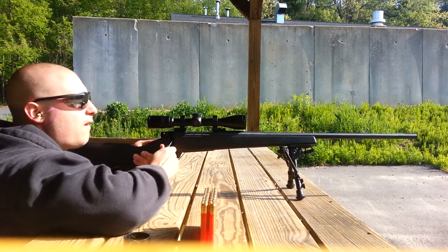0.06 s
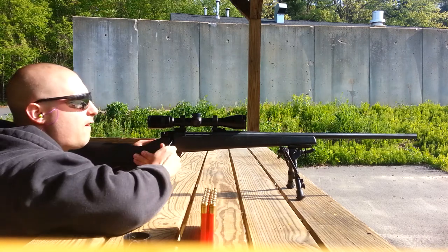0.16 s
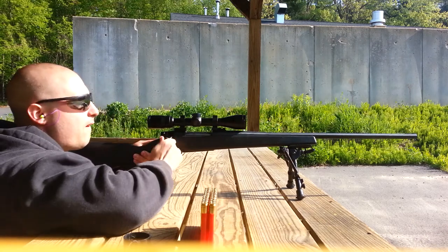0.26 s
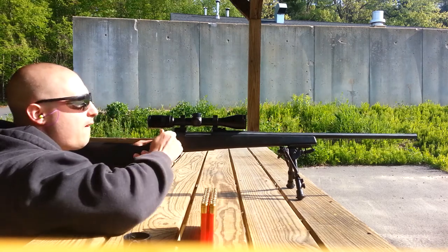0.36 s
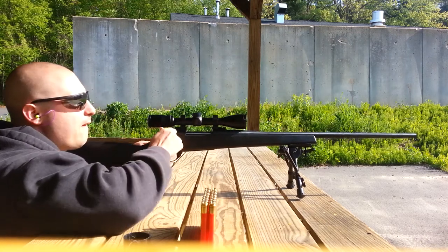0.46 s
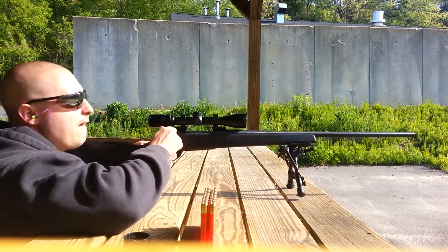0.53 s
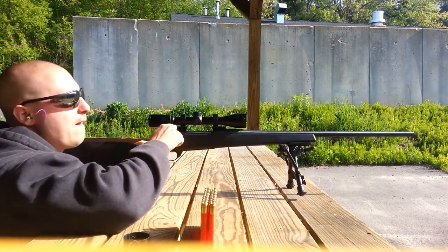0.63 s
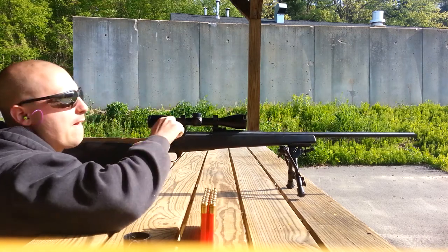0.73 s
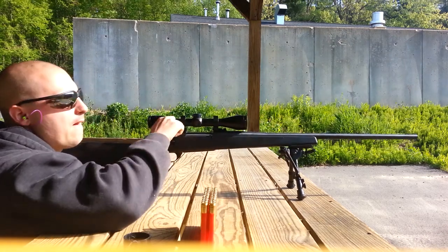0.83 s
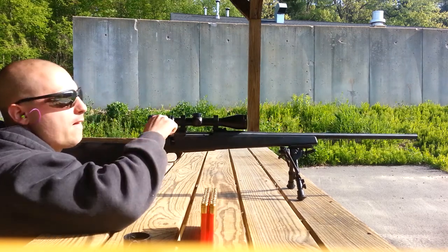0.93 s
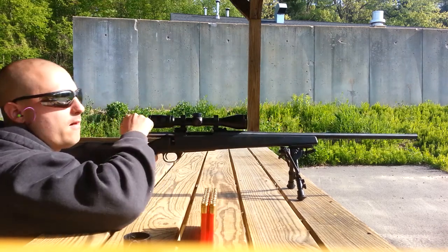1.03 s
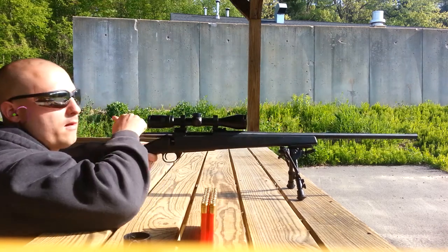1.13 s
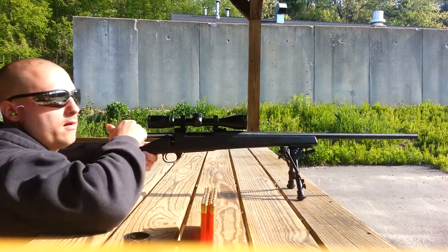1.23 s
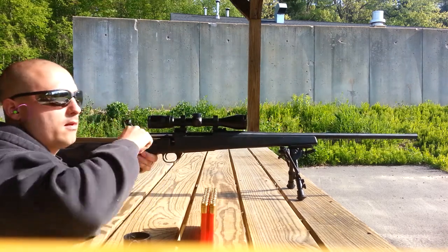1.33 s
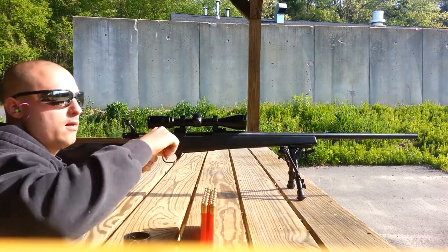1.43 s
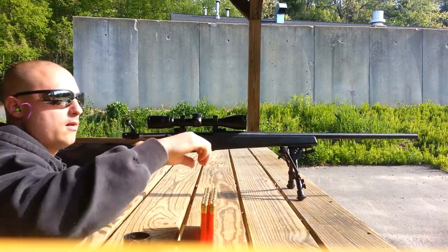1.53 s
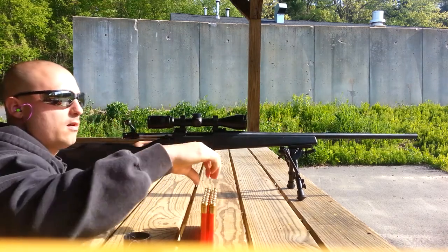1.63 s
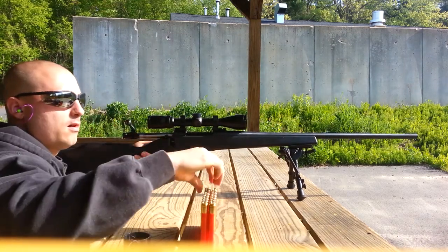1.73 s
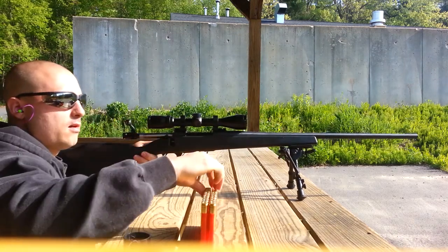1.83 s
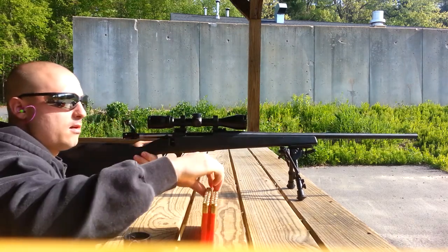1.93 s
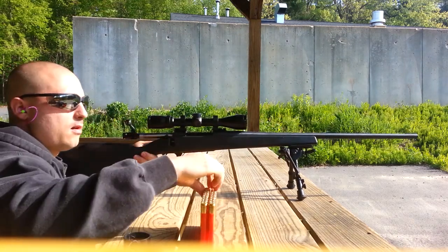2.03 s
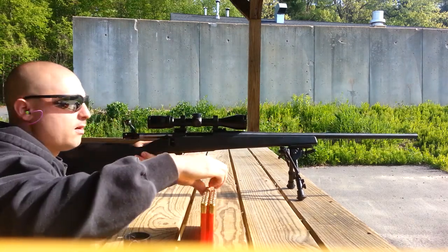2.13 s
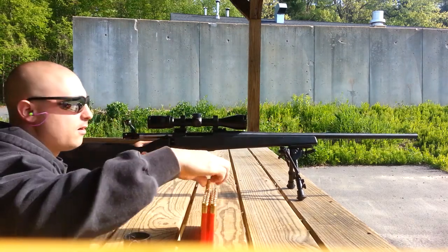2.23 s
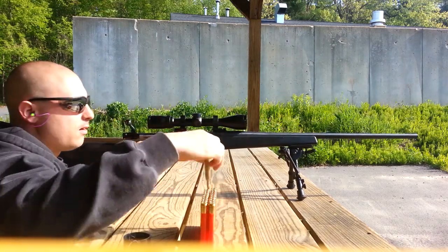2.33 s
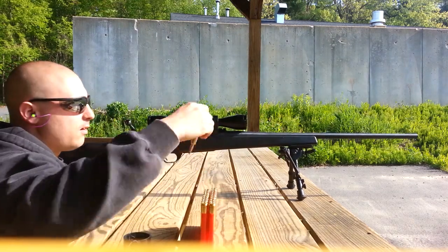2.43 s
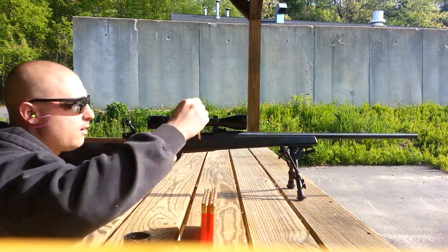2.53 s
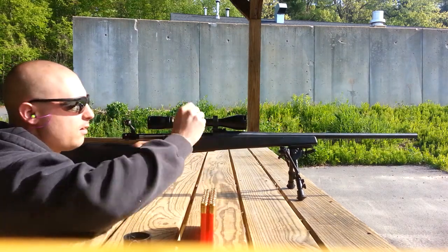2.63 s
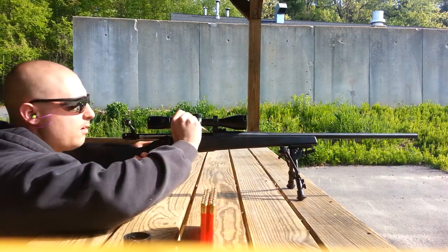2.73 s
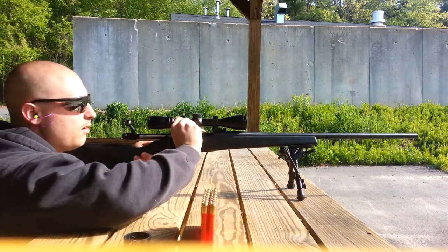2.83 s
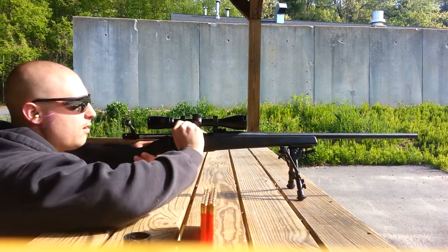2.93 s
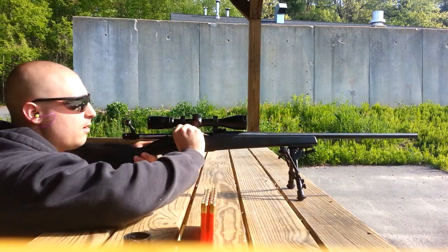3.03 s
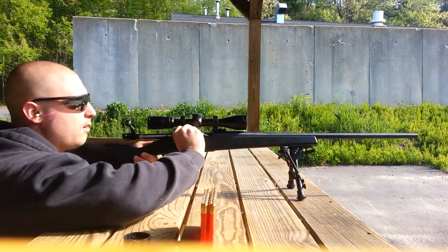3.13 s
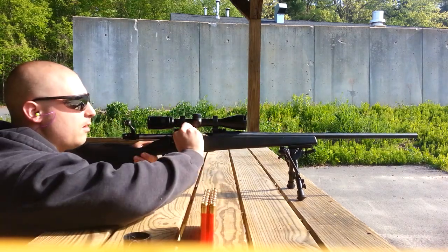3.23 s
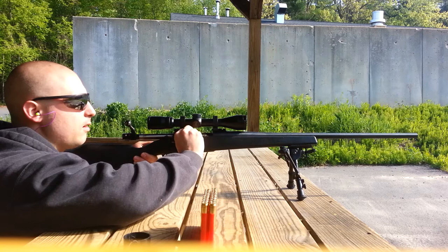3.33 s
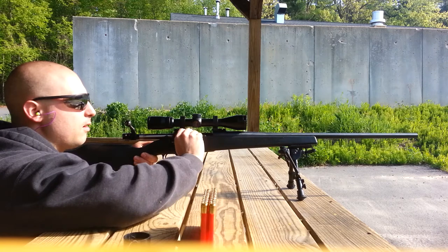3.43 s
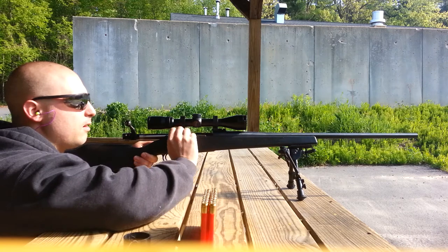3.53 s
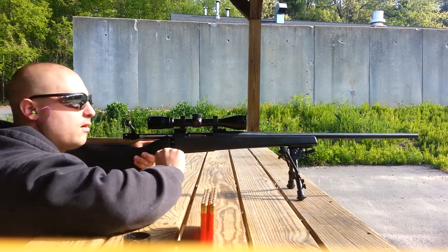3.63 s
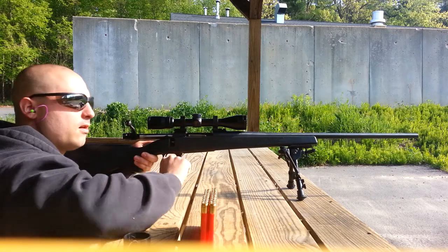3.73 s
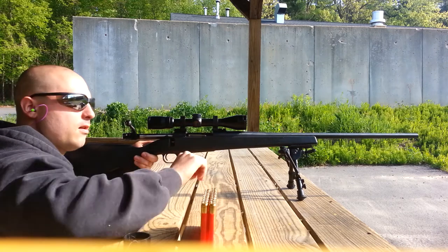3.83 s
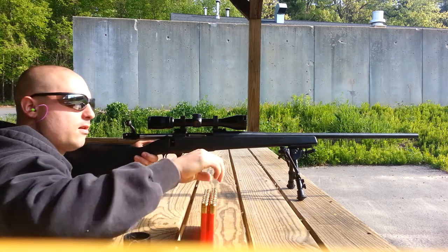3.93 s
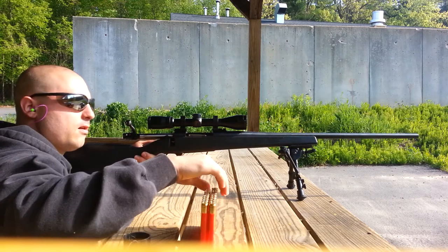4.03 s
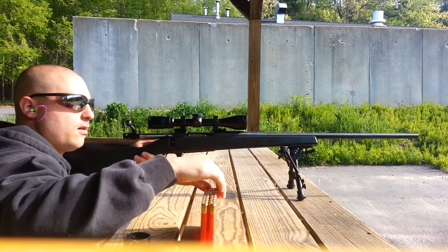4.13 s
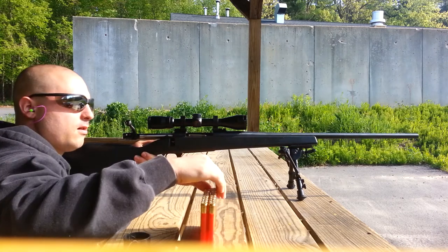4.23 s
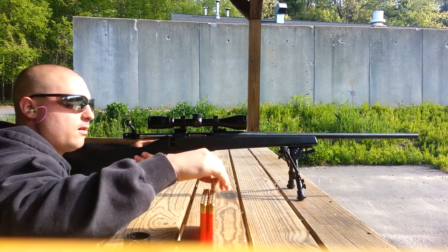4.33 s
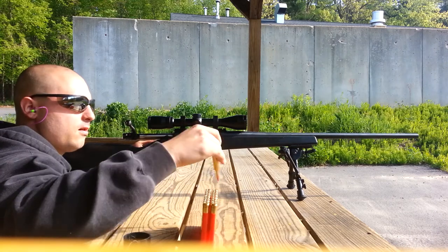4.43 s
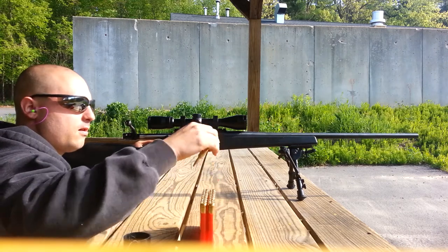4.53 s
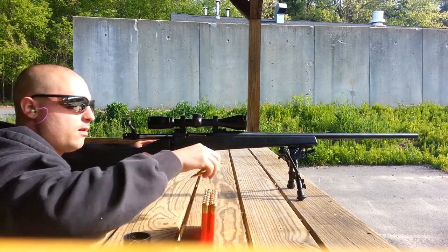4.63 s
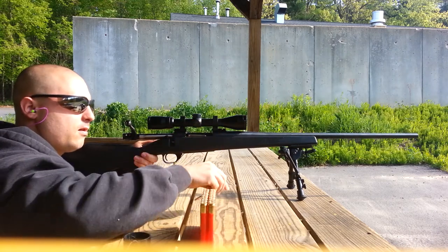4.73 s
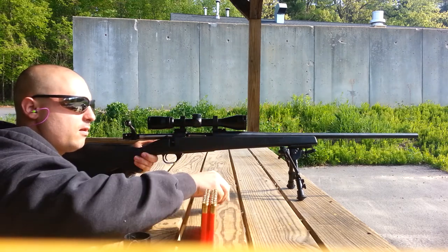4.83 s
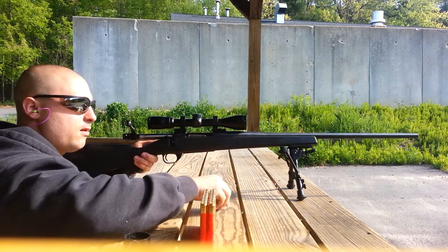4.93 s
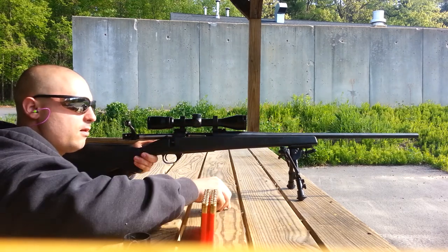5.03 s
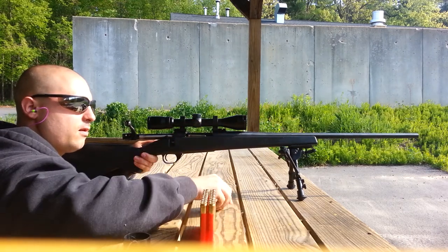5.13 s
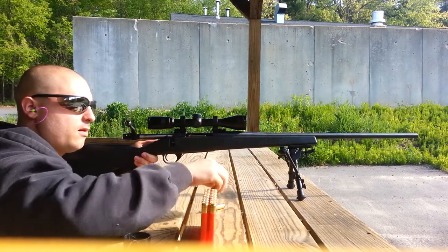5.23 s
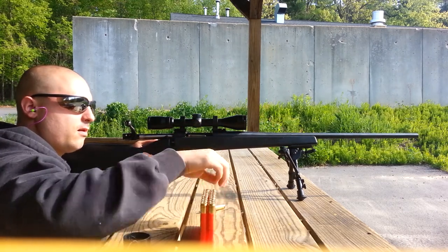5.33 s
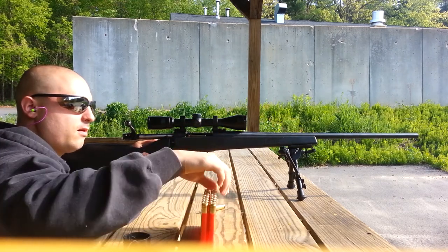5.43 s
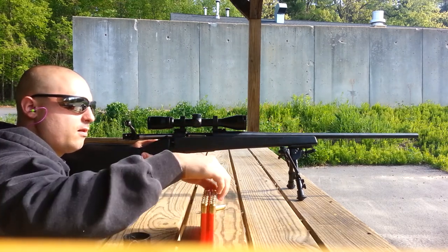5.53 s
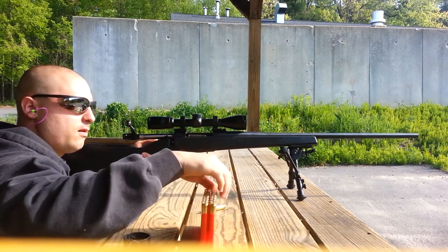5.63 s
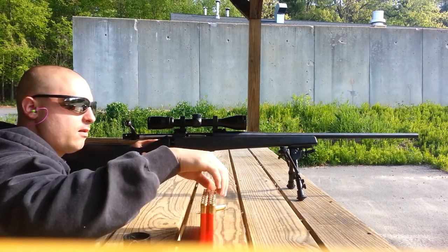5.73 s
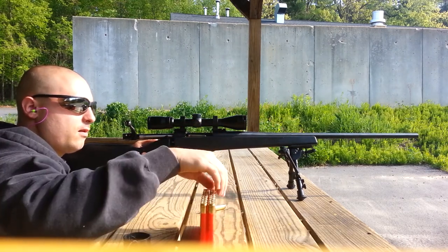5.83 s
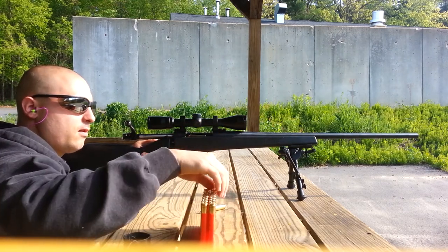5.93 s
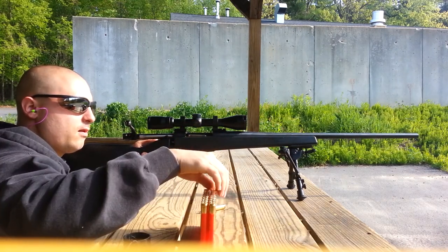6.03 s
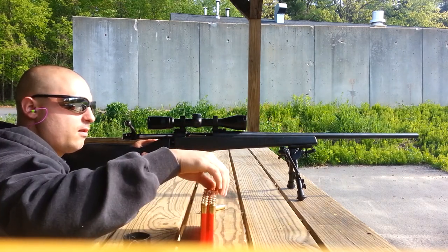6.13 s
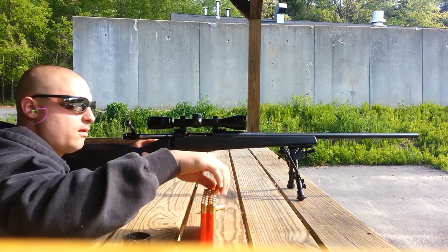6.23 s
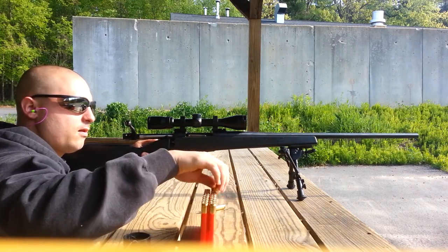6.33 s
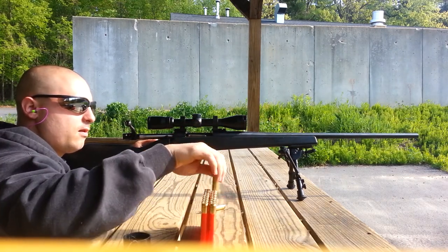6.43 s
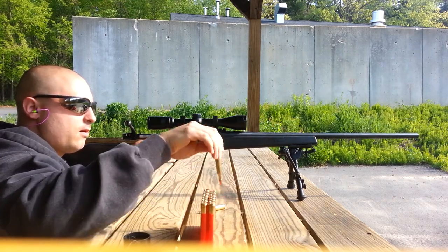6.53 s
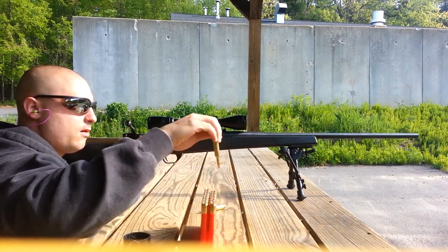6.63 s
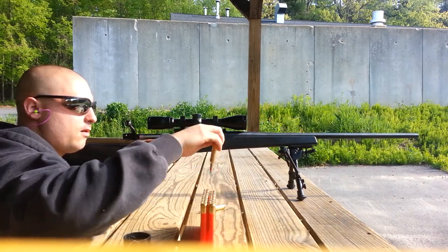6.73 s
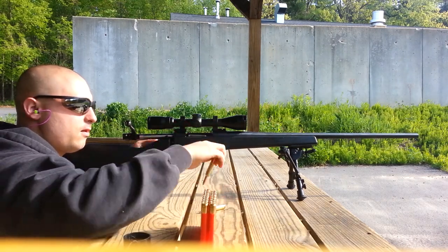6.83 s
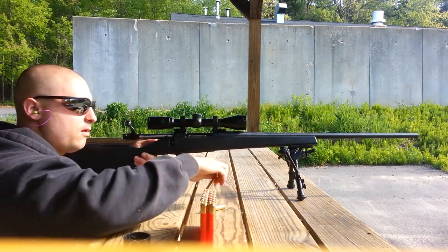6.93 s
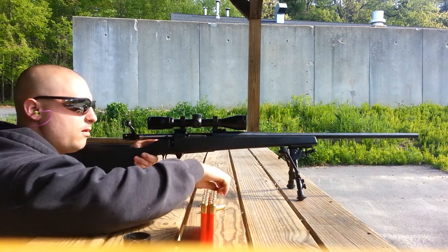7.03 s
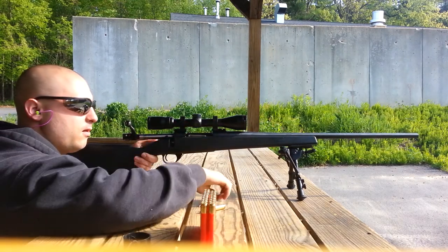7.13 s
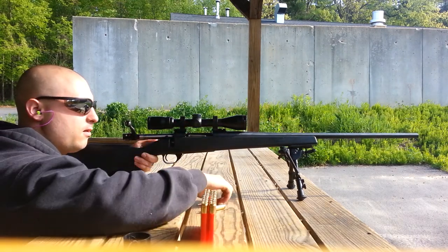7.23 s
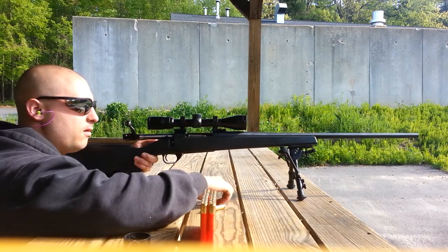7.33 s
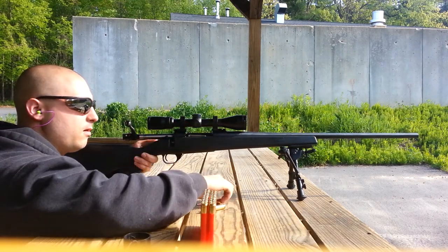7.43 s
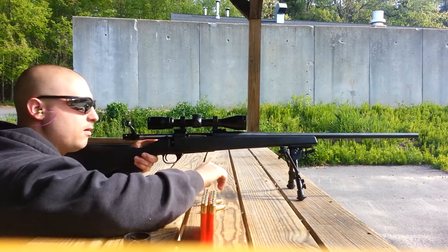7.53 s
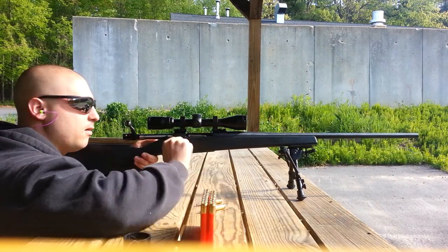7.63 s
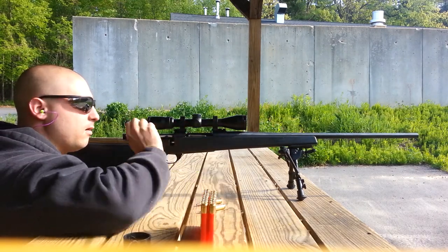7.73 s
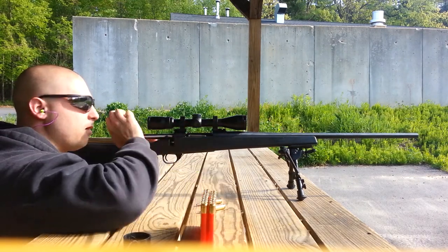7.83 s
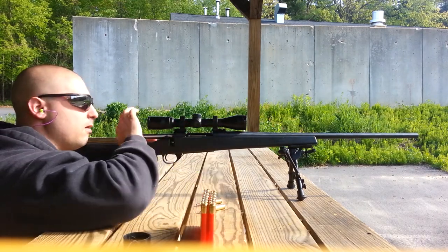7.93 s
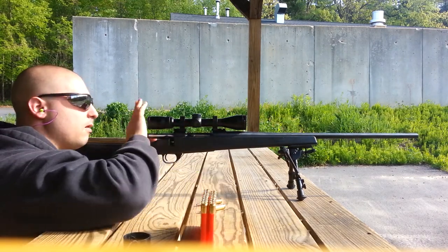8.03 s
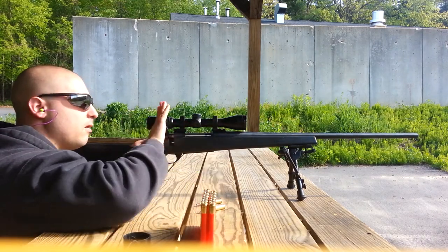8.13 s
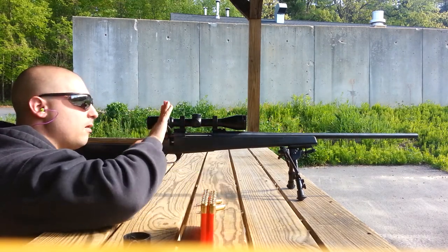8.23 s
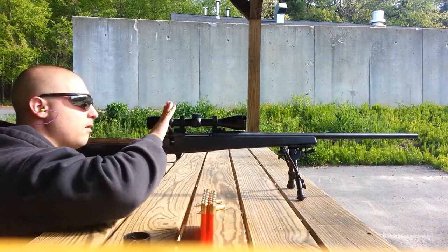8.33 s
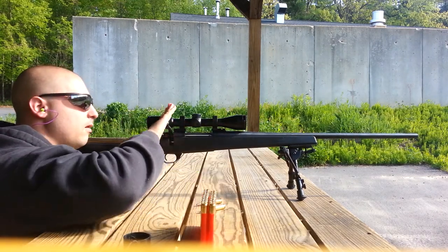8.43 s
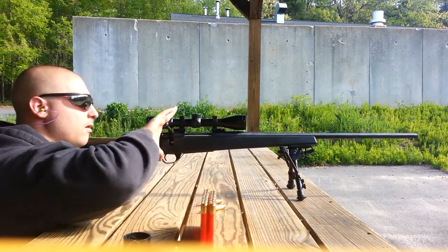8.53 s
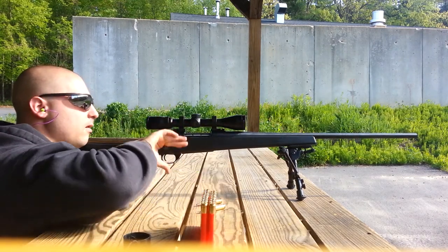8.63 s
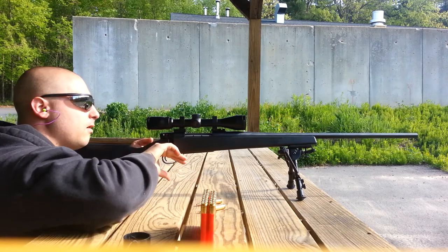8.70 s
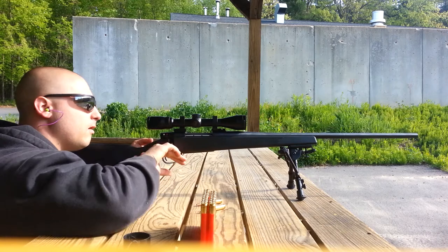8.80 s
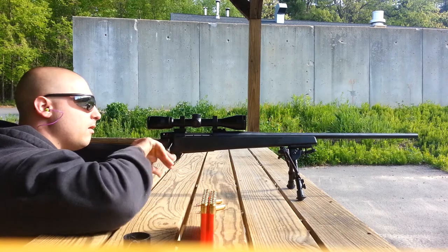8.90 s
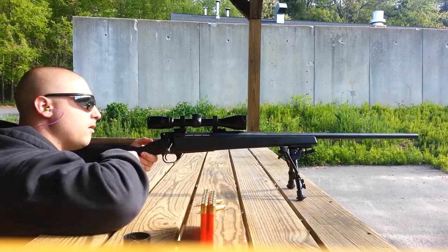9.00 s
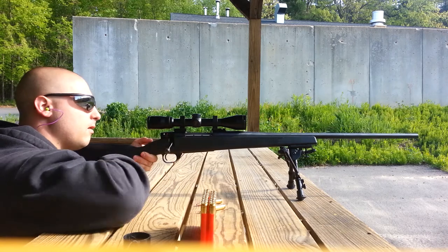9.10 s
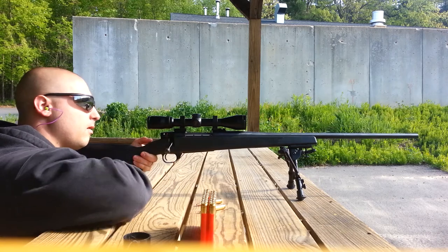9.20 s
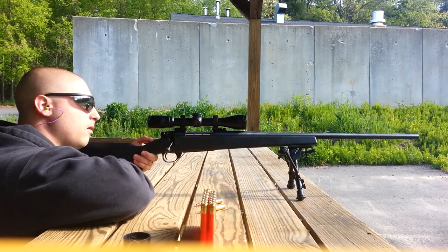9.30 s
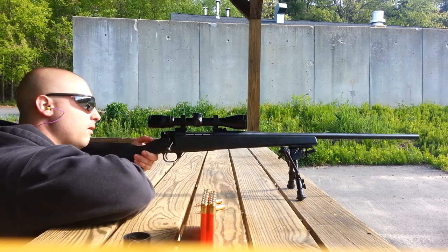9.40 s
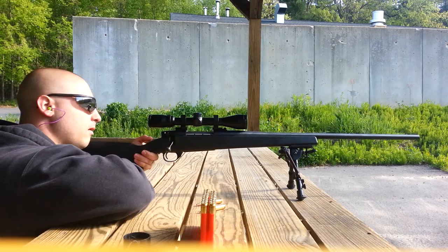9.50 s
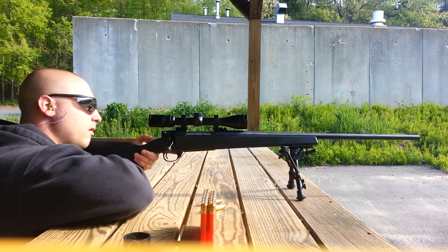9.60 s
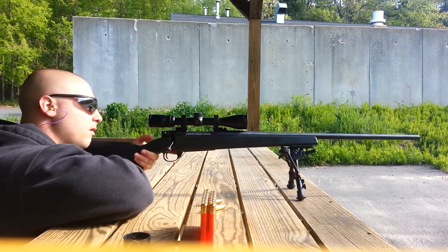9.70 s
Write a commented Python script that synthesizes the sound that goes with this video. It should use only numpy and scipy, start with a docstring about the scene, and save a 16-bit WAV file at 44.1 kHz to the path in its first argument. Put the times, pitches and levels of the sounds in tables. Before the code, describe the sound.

Outdoors under a roofed shooting bench, closely miked: a faint steel tick, then a loud bolt clack with bipod feet rattling on planks and a steel slide. Light brass and steel clicks follow as cartridges are loaded. A small bird trills rapidly in falling chips while cartridges knock dully on wood. The bolt then closes with a cluster of bright clacks, the last loudest. Soft traffic, rustle and hiss continue.

```python
"""A light tick of steel comes first, over far traffic and hiss; then a rifle bolt clacks open and shut.
Cartridges click into the magazine; cartridges and their box knock on the planks of an outdoor bench.
Blows excite damped modes of steel, brass and wood; sliding steel and shudders are shaped noise.
A small bird trills in falling sine chips and others whistle far off; rustle and a faint hum lie beneath.
A roof and far surroundings answer with noise whose frequencies decay at their own speeds."""
import sys
import numpy as np
from scipy import signal
from scipy.fft import rfft, irfft, next_fast_len
from scipy.io import wavfile
from scipy.ndimage import uniform_filter1d, map_coordinates

SR = 44100
rng = np.random.default_rng(int(sys.argv[2]) if len(sys.argv) > 2 else 0)


def generate_wav(sig):
    """Save sig (samples, or channels by samples) to the path in sys.argv[1] as 16-bit PCM at SR."""
    pcm = np.round(np.clip(np.atleast_2d(sig).T, -1, 1) * 32767).astype(np.int16)
    wavfile.write(sys.argv[1], SR, pcm)


N = 430416

# Steel contacts: (time [s], steel level [dB], bench, stock and bright steel re steel [dB each],
# favoured steel frequency [Hz])
STEEL_CONTACTS = [(0.0315, -34.5, -22.5, -9, -10.5, 2600), (0.7724, -22.5, -27.5, -18.5, -1, 4350),
                  (0.7793, -19.5, -31, -16, -1.5, 4730), (0.7907, -5, -29.5, -13, -7, 3080),
                  (0.797, -13, -23.5, -6, 5, 2900), (0.811, -19, 7, 0.5, -8.5, 4130),
                  (0.9906, -35, -29.5, -3, -19.5, 2160), (1.0126, -19.5, -15, -15, -16, 3680),
                  (1.0744, -27, -29.5, -6, -10.5, 2530), (1.0904, -22, -24, -4, -5.5, 3140),
                  (1.1031, -12.5, -5.5, -5, -1.5, 3780), (1.1117, -17.5, -17, -11, -6.5, 3980),
                  (1.273, -42, -7, -26, -24, 2060), (1.297, -50, 14.5, -6, -7, 2060),
                  (3.0665, -32, -17, -13, -6.5, 2530), (3.238, -29, -32, -8.5, -9.5, 3530),
                  (3.3865, -19, -36, -16.5, -4, 4480), (3.4143, -15, -32, -14.5, -7.5, 3070),
                  (3.4217, -21, -30, -12.5, -11.5, 2000), (3.4628, -18.5, -26, -16, -16, 2540),
                  (8.0022, -34.5, -12.5, -13, -25, 3890), (8.011, -32, -6, -9, -17, 3940),
                  (8.0397, -25.5, -29, -6, -13.5, 2330), (8.0577, -15, -24.5, -17, -4, 4460),
                  (8.089, -12.5, -20, -14.5, -1.1, 4480), (8.1085, -14.5, -19.5, -14, -9, 4460),
                  (8.1316, -4, -18.5, -9.5, 0.5, 3780), (8.1411, -5, -23.5, -15.5, -4, 2920),
                  (8.1633, -9, -13.5, -8.5, -5, 3800), (8.301, 2, -25.5, -17, -8, 3200),
                  (8.6189, -17.5, -18.5, -10.5, -17, 3940), (8.6242, -14.5, -24, -13, -9, 3130),
                  (8.6593, -25.5, -15, -13, 0.5, 2580), (8.705, -16, -6, -5, -15, 3560)]
# Modes of the bench planks: (frequency [Hz], bandwidth [Hz], level [dB])
BENCH_MODES = [(130, 50, -13), (175, 60, -3), (235, 60, 0), (300, 70, -2), (465, 90, -1.5)]
# Modes of the rifle stock: (frequency [Hz], bandwidth [Hz], level [dB])
STOCK_MODES = [(568, 61, -9), (801, 200, -3), (1102, 110, -2.5), (1350, 390, -18.5)]
# Modes of the receiver: (frequency [Hz], bandwidth [Hz], level [dB])
RECEIVER_MODES = [(1670, 300, -5), (2160, 130, -1.5), (2560, 200, -4), (2918, 110, -4), (3110, 120, -0.1),
                  (3400, 130, -4.5), (3740, 380, -5.5), (4160, 330, -6), (4490, 200, -7.5)]
# Bright modes of the bolt: (frequency [Hz], bandwidth [Hz], level [dB])
BOLT_MODES = [(5000, 700, -6), (5650, 600, -4), (6230, 250, 0), (6570, 250, -2), (7200, 900, -5),
              (8060, 800, -6), (9100, 1100, -8), (10600, 1500, -11), (12300, 1500, -13), (14300, 500, -11)]
RATTLE_T60_S, RIFLE_PAN_DB, BOLT_FOCUS_HZ = 0.02, 2, 6200  # the same for every steel contact


def steel_contacts():
    """Modal excitation: each contact rings bolt, receiver, stock and bench at once."""
    out = np.zeros((2, N))
    bolt = favoured(BOLT_MODES, BOLT_FOCUS_HZ, db_per_octave=4.0, boost_db=3.0)
    for s, db, bench_db, stock_db, bright_db, steel_hz in STEEL_CONTACTS:
        receiver = favoured(RECEIVER_MODES, steel_hz)
        parts = [
            (BENCH_MODES, 95, 600, bench_db, 2.2),
            (STOCK_MODES, 450, 1600, stock_db, 1.4),
            (receiver, 1300, 5600, -1.2, 1.1),
            (bolt, 4600, 15500, bright_db, .9),
        ]
        add(out, amp(db) * blow(parts, RATTLE_T60_S, -0.41, RIFLE_PAN_DB), s)
    return out


# Cartridges touching as they leave the box:
# (time [s], level [dB], bench re level [dB], upper brass re level [dB])
CARTRIDGE_PICKS = [(2.3385, -33, -8, -10), (2.3693, -26, -14.5, -3.5), (4.4146, -34.5, -13, -1.5),
                   (4.6147, -41.5, -14, -24)]
# Modes of the cartridge brass: (frequency [Hz], bandwidth [Hz], level [dB])
BRASS_MODES = [(2110, 170, 0.1), (3060, 30, 6.5), (4300, 530, -13)]
# Upper modes of the brass: (frequency [Hz], bandwidth [Hz], level [dB])
UPPER_BRASS_MODES = [(6650, 550, -3.5), (7700, 730, 1.1), (9330, 1100, -4), (12000, 2500, -10.5)]
# A cartridge seating with a falling clink: (time [s], frequency [Hz], level [dB])
SEATING_CLINK = [(4.413, 2720, -42), (4.421, 1980, -43.5), (4.437, 1580, -47)]


def cartridges():
    """Modal ringing of brass on the bench, and one gliding partial as a cartridge seats."""
    out = np.zeros((2, N))
    for s, db, bench_db, top_db in CARTRIDGE_PICKS:
        parts = [
            (BENCH_MODES, 95, 600, bench_db, 4.0),
            (BRASS_MODES, 1300, 5600, -1.2, 1.1),
            (UPPER_BRASS_MODES, 5600, 15500, top_db, .9),
        ]
        add(out, amp(db) * blow(parts, 0.0091, -2.2, 1.5), s)
    clink = np.pad(note(SEATING_CLINK), (0, SR // 4))  # room for the roof's answer
    add(out, shelter(clink, wet_db=-4.5), SEATING_CLINK[0][0])
    return out


# Cartridges and their box knocking on the planks:
# (time [s], level [dB], boom re level [dB], edge re level [dB], left-right difference [dB])
PLANK_KNOCKS = [(4.865, -32, -8.5, -28, 3), (4.98, -34, -6.5, -14, 0), (5.017, -18, -17, -7.5, 1),
                (7.03, -22, -10, -28.5, -0.5), (7.195, -29, -9, -22, -0.5), (7.229, -16, -19, -7, -0.5),
                (9.155, -43.5, -1, -14, 0)]
# Bipod feet bouncing:
# (time [s], level [dB], boom re level [dB], edge re level [dB], left-right difference [dB])
BIPOD_FEET = [(0.855, -11, -9.5, -7, 12.5), (0.886, -22.5, -11, -13, 4.5), (0.911, -27.5, -2.5, 0, 5.0),
              (0.931, -30.5, 0, 0, 3.0), (0.953, -21.5, -7.5, -12, 9.3), (8.706, -12, -8, -14, 1.5)]
# Modes of a plank struck directly: (frequency [Hz], bandwidth [Hz], level [dB])
BOARD_MODES = [(443, 140, -3), (617, 190, 2.5), (885, 130, 4), (1170, 200, 0), (1310, 240, -6)]
# Upper modes of the planks: (frequency [Hz], bandwidth [Hz], level [dB])
UPPER_PLANK_MODES = [(1630, 340, 1), (2141, 320, 6.5), (2590, 242.5, 0.7), (3200, 420, -8),
                     (3710, 500, -17), (4410, 170, -17.5)]
REBOUND_S, REBOUND_DB = .0115, -4.5  # each knock of a cartridge or the box lands twice


def bench_knocks():
    """Impact on damped wood: knocks with a rebound, and bouncing feet, ring the planks dully."""
    out = np.zeros((2, N))
    rebounds = [(s + REBOUND_S, db + REBOUND_DB, *rest) for s, db, *rest in PLANK_KNOCKS]
    for table, t60, wet_db in ((PLANK_KNOCKS + rebounds, .018, 2.5), (BIPOD_FEET, .0008, -15)):
        for s, db, boom_db, edge_db, pan_db in table:
            parts = [
                (BENCH_MODES, 130, 500, boom_db, 2.2),
                (BOARD_MODES, 300, 1400, -1.2, 1.3),
                (UPPER_PLANK_MODES, 1300, 4200, edge_db, 1.05),
            ]
            add(out, amp(db) * blow(parts, t60, wet_db, pan_db), s)
    return out


# Bolt and cartridges sliding on steel: (time [s], length [s], first level [dB], last level [dB])
STEEL_SLIDES = [(.955, 0.053, -50, -44.5), (1.012, 0.1, -40, -41), (3.04, .04, -57, -54),
                (3.42, .08, -57, -44.5), (4.31, 0.098, -67, -55.5), (4.415, 0.054, -56, -62),
                (8.07, .12, -63, -41), (8.62, .09, -61.5, -63)]


def sliding_steel():
    """Rough friction: grainy noise drives the resonances of receiver and bolt."""
    grit = rng.standard_normal(N) * amp(5 * wobble(900))
    steel = body(RECEIVER_MODES + BOLT_MODES)
    scrape = unit(filtered(grit, lambda f: steel(f) / (1 + (f / 6500) ** 4)))
    return strokes(STEEL_SLIDES) * scrape


# Shudders of the bench under the rifle: (time [s], nominal peak level [dB], decay time T60 [s])
BENCH_SHUDDERS = [(.795, -20.5, 0.59), (1.03, -33, 0.27), (1.1, -25.5, 0.46), (1.285, -36, 0.42),
                  (3.07, -48, .4), (3.41, -41, .4), (4.34, -44.5, .5), (8.01, -34, 0.46),
                  (8.065, -28, 0.32), (8.13, -34.5, .4), (8.29, -42.5, .3), (8.695, -34, 0.51),
                  (9.2, -48, .4)]


def bench_shudder():
    """Forced vibration: low-passed noise through the bench modes swells and dies away."""
    bench = body(BENCH_MODES)
    planks = lambda f: bench(f) * f ** 2 / (f ** 2 + 130 ** 2) / (1 + (f / 330) ** 4)
    rumble = unit(filtered(rng.standard_normal(N), planks))
    return swells(BENCH_SHUDDERS, rise_s=.015) * amp(-4.5 + 1.9 * wobble(30)) * rumble


# Sways of the whole bench: (time [s], peak level [dB], decay time T60 [s])
BENCH_SWAYS = [(.79, -36.5, 0.64), (1.12, -58, 0.45)]


def bench_sway():
    """Low resonance: partly shared stereo noise is filtered twice by a mode at 80 Hz."""
    shared, left, right = rng.standard_normal((3, N))
    pair = shared + 0.87 * np.array([left, right])
    sway = unit(filtered(pair, lambda f: body([(80, 60, 0)])(f) ** 2))
    return swells(BENCH_SWAYS, rise_s=0.073) * sway


# Slips of a bolt lug: (time [s], length [s], first level [dB])
LUG_SLIPS = [(8.058, .013, -14.5), (8.091, .011, -22), (8.112, .016, -26)]
SQUEAL_HZ, SQUEAL_SAG_DB = 4458, 3  # mean pitch; fall in level during a slip


def lug_squeal():
    """Frictional squeal: short strokes of a sine whose frequency wanders slightly."""
    slips = strokes([(s, length, db, db - SQUEAL_SAG_DB) for s, length, db in LUG_SLIPS])
    hz = SQUEAL_HZ + 8 * wobble(200)
    return slips * np.sqrt(2) * np.sin(2 * np.pi * np.cumsum(hz) / SR)


def bolt_travel():
    """Superposition of slide, shudder, squeal and sway; all but the sway excite the roof."""
    rubbing = shelter(sliding_steel() + bench_shudder(), wet_db=-9.5, pan_db=0.5)
    return bench_sway() + rubbing + shelter(lug_squeal(), wet_db=-13, pan_db=7.5)


# Gliding tones, one of steel and the rest far whistles: (time [s], length [s], first frequency [Hz],
# last frequency [Hz], level before sag and flutter [dB])
GLIDING_TONES = [(1.3, .13, 2014, 2030, -65.5), (1.392, .06, 2700, 2660, -60),
                 (1.498, .048, 2070, 2060, -70), (1.597, 0.042, 2627, 2597, -62.5),
                 (4.314, .1, 2700, 2050, -63), (1.606, .046, 2030, 2090, -70),
                 (2.929, 0.2, 2694, 2743, -60.5), (3.043, .2, 1920, 1940, -65),
                 (6.17, 0.2, 3520, 3515, -67), (6.339, .027, 3400, 2370, -65),
                 (6.413, 0.28, 1910, 1912, -73), (6.53, 0.19, 2410, 2400, -68),
                 (6.54, .21, 2966, 2945, -72), (6.775, 0.13, 1780, 1765, -67),
                 (6.914, 0.088, 3130, 3060, -59), (6.965, 0.042, 2570, 2160, -57.5),
                 (7.0, .05, 2140, 2114, -59), (7.061, 0.057, 3084, 3085, -54),
                 (7.105, 0.041, 2520, 2560, -58.5), (7.1, 0.092, 2200, 2120, -66),
                 (8.94, .07, 2355, 2310, -76), (9.08, .09, 2420, 2370, -72), (7.282, 0.15, 3090, 3120, -72),
                 (7.58, 0.21, 2796, 1510, -61), (7.695, 0.081, 3640, 3100, -67),
                 (9.488, .06, 4380, 4260, -73.5), (9.556, .19, 2350, 2260, -71.5),
                 (9.639, 0.073, 4910, 4900, -73), (9.705, .04, 4220, 4300, -73)]
FALLING_RATTLE = GLIDING_TONES[4:5]  # beside the slide at 4.31 s


def falling_rattle():
    """Amplitude modulation: a falling rattle of steel is a downward glide that flutters."""
    return fluttering_glides(FALLING_RATTLE)


# Strength of the trill before the chip's own levels: (time [s], level [dB])
TRILL_STRENGTH = [(3.9, -49.5), (4.4, -45), (5.0, -36), (5.7, -44.5), (6.0, -43), (6.2, -36.5),
                  (6.5, -35.5), (7.05, -37.5)]
# One chip: (time from chip [s], frequency [Hz], relative level [dB])
CHIP_SHAPE = [(-.012, 7330, -18), (-.005, 7150, -11), (.004, 5800, -5), (.014, 4326, -9),
              (.024, 3590, -17.5), (.04, 3400, -7.5)]
# The note leading into a chip: (time from chip [s], frequency [Hz], relative level [dB])
LEAD_IN_SHAPE = [(-.044, 8420, 1), (-.036, 8070, -12), (-.028, 7700, -4)]
TRILL_START_S, CHIP_GAP_S, GAP_GROWS_S = 3.919, .1209, .00032  # first chip, first gap, growth a chip
CHIP_COUNT = 26
HEAD_START_S = .013  # lead of the first chip, halved at each next chip
LEAD_IN_DB = -17  # gain of the lead-in note


def trill():
    """Frequency modulation: a slowing series of chips, each a lead-in and a rapid falling glide."""
    near = np.zeros(N)
    for k in range(CHIP_COUNT):
        s = TRILL_START_S + k * (CHIP_GAP_S + GAP_GROWS_S * k / 2) - HEAD_START_S / 2 ** k
        pitch = 1 + 0.00748 * rng.standard_normal()
        db = np.interp(s, *np.transpose(TRILL_STRENGTH))
        add(near, amp(db - 5.5) * note(CHIP_SHAPE, pitch), s + CHIP_SHAPE[0][0])
        add(near, amp(db + LEAD_IN_DB) * note(LEAD_IN_SHAPE, pitch), s + LEAD_IN_SHAPE[0][0])
    return shelter(near, wet_db=-5.5, pan_db=1.0, lag=7)


FAR_WHISTLES = GLIDING_TONES[:4] + GLIDING_TONES[5:]  # all but the steel
PIPE_START_S, PIPE_GAP_S, PIPE_LENGTH_S, PIPE_COUNT = 9.21, .07, .035, 8  # a far bird repeats one note
PIPE_HZ, PIPE_RISE_HZ, PIPE_DB = 2600, 9, -63  # first pitch, rise a note, mean level before sag and flutter


def far_whistles():
    """Amplitude modulation: gliding sines from far birds flutter in the air."""
    piping = []
    for k in range(PIPE_COUNT):
        s, hz = PIPE_START_S + k * PIPE_GAP_S, PIPE_HZ + PIPE_RISE_HZ * k
        piping.append((s, PIPE_LENGTH_S, hz, hz + rng.normal(0, 41), PIPE_DB + rng.normal(0, 1.2)))
    return fluttering_glides(FAR_WHISTLES + piping)


# Level of the far traffic: (time [s], level [dB])
TRAFFIC_LEVEL = [(0, -56), (.6, -57), (1.3, -52), (1.65, -55.5), (2.0, -57.5), (2.45, -51.5), (2.9, -55),
                 (3.3, -54), (4.05, -57.5), (4.8, -52), (5.5, -55.5), (6.1, -55.5), (6.5, -53.5),
                 (6.9, -54.5), (7.7, -57), (8.5, -51.5), (9.0, -55), (9.76, -57)]
# Spectrum of the traffic: (frequency [Hz], relative level per Hz [dB])
TRAFFIC_SPECTRUM = [(15, -70.5), (25, -36.5), (68, -3), (150, -3.5), (179, -0.5), (238, -4), (329, -8),
                    (353, -6.5), (505, -9), (980, -14), (1800, -30.5), (2340, -56), (3960, -120)]


def far_traffic(traffic_db):
    """Broadband noise of a fixed spectrum follows a slow level curve with small fluctuations."""
    return amp(traffic_db + .7 * wobble(6)) * rush(TRAFFIC_SPECTRUM, patchy_db=1.2)


# Movements of a sleeve: (time [s], level [dB])
SLEEVE_MOVES = [(0, -66.5), (1.3, -60), (1.65, -66.5), (2.45, -57), (3.3, -60), (3.7, -63), (4.85, -63),
                (5.5, -67), (6.75, -65), (7.8, -64.5), (9.3, -64.5), (9.76, -64.5)]
# Spectrum of leaves and sleeve: (frequency [Hz], relative level per Hz [dB])
RUSTLE_SPECTRUM = [(710, -35.5), (1200, -4), (2270, 3), (2840, 1), (3320, 1), (4020, -5.5), (6500, -28),
                   (8450, -37.5), (14300, -120)]
LEAVES_DB, SLEEVE_WIDTH_S = -68, .25  # steady leaves; half width of a sleeve movement


def rustle():
    """Incoherent addition: steady leaves and Gaussian sleeve movements add in power."""
    t = np.arange(N) / SR
    power = amp(LEAVES_DB) ** 2
    for s, db in SLEEVE_MOVES:
        power = power + amp(db) ** 2 * np.exp(-((t - s) / SLEEVE_WIDTH_S) ** 2)
    return np.sqrt(power) * rush(RUSTLE_SPECTRUM, patchy_db=1)


# Spectrum of the microphone hiss: (frequency [Hz], relative level per Hz [dB])
HISS_SPECTRUM = [(2350, -34.5), (4000, -2.5), (4620, -2), (6950, -4), (9990, -4), (14000, -4), (14900, -11),
                 (15200, -29.5)]
HISS_DB, HISS_FOLLOWS = -65, .7  # mean level; its swing over the swing of the traffic


def hiss(traffic_db):
    """Shaped random noise, its level following part of the traffic's swing."""
    level_db = HISS_DB + HISS_FOLLOWS * (traffic_db - traffic_db.mean())
    return amp(level_db) * rush(HISS_SPECTRUM, patchy_db=.5)


# Tones of the hum: (frequency [Hz], level before fluctuation [dB])
HUM_TONES = [(123.8, -75.5), (360.7, -68)]


def hum():
    """Steady tones whose amplitude and phase drift at random."""
    t = np.arange(N) / SR
    out = np.zeros(N)
    for hz, db in HUM_TONES:
        level = np.sqrt(2) * amp(db - 2 + 3 * wobble(5))
        out += level * np.sin(2 * np.pi * hz * t + 1.2 * wobble(8))
    return out


def background():
    """Superposition of traffic, rustle, hiss and hum."""
    traffic_db, = curves(TRAFFIC_LEVEL)
    return far_traffic(traffic_db) + rustle() + hiss(traffic_db) + hum()


# Decay under the roof over the bench: (frequency [Hz], decay time T60 [s])
ROOF_DECAY = [(150, 0.27), (1000, 0.29), (3000, 0.22), (8000, 0.19), (14000, 0.11)]


def shelter(x, wet_db, pan_db=0, lag=0, radiated=None):
    """Diffuse reflection: direct sound, left side lag samples late, plus the roof's answer to all radiated."""
    source = x if radiated is None else radiated
    delayed = np.pad(source, (SR // 400, 0))[None]
    wet = signal.fftconvolve(delayed, tail(ROOF_DECAY, .3), axes=1)[:, :len(x)]
    direct = [np.roll(x, int(lag)), x]
    return (direct + amp(wet_db) * wet) * amp([[pan_db / 2], [-pan_db / 2]])


# Decay from far wall and trees: (frequency [Hz], decay time T60 [s])
RANGE_DECAY = [(150, .9), (1500, 0.58), (12000, 1.05)]


def range_echo(rifle):
    """Delayed reverberation: far wall and trees return the rifle's sound after 62 ms."""
    delayed = np.pad(rifle.mean(0), (SR // 16, 0))[None]
    return amp(-32.5) * signal.fftconvolve(delayed, tail(RANGE_DECAY, 0.98), axes=1)[:, :N]


# Interchannel correlation of background noise: (frequency [Hz], left-right likeness [-1 to 1])
LEFT_RIGHT_LIKENESS = [(60, 0.44), (150, 0.65), (380, 0.37), (940, 0.47), (2350, -0.18), (5890, -0.15),
                       (14700, 0.38)]


def rush(spectrum, patchy_db):
    """Partially coherent stereo noise of rms 1, with time-frequency patches of random gain."""
    z = signal.stft(rng.standard_normal((2, N)), nperseg=512)[2]
    field = uniform_filter1d(rng.standard_normal(z.shape[1:]), size=6, axis=0)
    field = uniform_filter1d(field, size=14, axis=1)
    pair = signal.istft(z * amp(patchy_db * unit(field)), nperseg=512)[1][:, :N]

    def mid_side(hz):
        turn = np.arccos(np.clip(along(LEFT_RIGHT_LIKENESS, hz), -1, 1)) / 2
        return amp(along(spectrum, hz)) * [np.cos(turn), np.sin(turn)]

    mid, side = filtered(pair, mid_side)
    return unit(np.array([mid + side, mid - side]))


def blow(parts, t60, wet_db, pan_db):
    """Impulse response: a blow with a short rattle rings parts (modes, low Hz, high Hz, dB, slowness)."""
    t, direct, radiated = np.arange(SR // 3) / SR, 0, 0
    impulse = 1. * (np.arange(len(t)) == SR // 1000)
    for modes, low_hz, high_hz, db, slowness in parts:
        force = rng.standard_normal(len(t)) * amp(-60 * t / (slowness * max(t60, .0005)))
        force[0] = 3.6  # the sharp blow itself
        edges = signal.butter(4, [low_hz, high_hz], "band", fs=SR, output="sos")
        ring = signal.sosfilt(edges, filtered(force, body(modes)))
        ring = amp(db) * ring / np.abs(ring).max()
        direct = direct + ring
        # over all directions the modes add in power
        power = lambda f: sum(np.abs(body([(c, 1.6 * w, level)])(f)) ** 2 for c, w, level in modes)
        around = signal.sosfilt(edges, filtered(impulse, lambda f: np.sqrt(power(f))))
        radiated = radiated + around * np.linalg.norm(ring) / np.linalg.norm(around)
    return shelter(direct, wet_db, pan_db, radiated=radiated)


def favoured(modes, focus_hz, db_per_octave=6, boost_db=7):
    """Selective excitation: the point of contact favours modes near one frequency."""
    out = []
    for c, w, db in modes:
        octaves = abs(np.log2(c / focus_hz))
        out.append((c, w, db - db_per_octave * octaves + boost_db * np.exp(-(octaves / 0.14) ** 2)))
    return out


def body(modes):
    """Modal superposition: causal response of damped resonances with alternating signs."""
    def mode(k, f, c, w, db):
        return (-1) ** k * amp(db) * 1j * f * w / (c * c - f * f + 1j * f * w)
    return lambda f: sum(mode(k, f, *row) for k, row in enumerate(modes))


def tail(t60s, seconds):
    """Exponential decay: stereo noise, left energy 1, in which each frequency dies at its own speed."""
    hz, t, z = signal.stft(rng.standard_normal((2, int(SR * seconds))), SR, nperseg=256)
    decay = amp(-60 * t / along(t60s, hz)[:, None])
    noise = signal.istft(z * decay, SR, nperseg=256)[1]
    return noise / np.linalg.norm(noise[0])


def fluttering_glides(rows):
    """Amplitude modulation: sines glide in pitch, sag in level and flutter under the roof."""
    out = np.zeros(N)
    for s, length, hz0, hz1, db in rows:
        bend = hz1 + .4 * (hz0 - hz1)  # glides slow down towards their end
        shape = [(0, hz0, db), (length / 2, bend, db - 1), (length, hz1, db - 3)]
        add(out, np.sqrt(2) * note(shape), s)
    return shelter(out * amp(4 * wobble(70) - 2.5), wet_db=2.5)


def note(shape, pitch=1):
    """Phase integration: a sine along (time [s], frequency [Hz], level [dB]) with soft ends."""
    s, hz, db = np.transpose(shape)
    t = np.arange(s[0], s[-1], 1 / SR)
    ends = np.clip(np.minimum(t - s[0], s[-1] - t) / 0.0015, 0, 1)
    phase = 2 * np.pi * np.cumsum(pitch * np.interp(t, s, hz)) / SR
    return ends * amp(np.interp(t, s, db)) * np.sin(phase)


def strokes(rows):
    """Envelope of (time [s], length [s], first level [dB], last level [dB]) strokes, silent between."""
    t, gain = np.arange(N) / SR, 0
    for s, length, first_db, last_db in rows:
        times = [s - .003, s, s + length, s + length + .009]
        gain = gain + np.interp(t, times, [0, amp(first_db), amp(last_db), 0])
    return gain


def swells(rows, rise_s):
    """Envelope of (time [s], peak [dB], T60 [s]) pushes: quadratic growth, exponential decay."""
    t, gain = np.arange(N) / SR, 0
    for s, db, t60 in rows:
        decay = amp(db - 60 * np.maximum(t - s - rise_s, 0) / t60)
        gain = gain + decay * np.clip((t - s) / rise_s, 0, 1) ** 2
    return gain


def amp(db):
    """Decibel law: level to amplitude ratio."""
    return 10 ** (np.asarray(db) / 20)


def unit(x):
    """Normalisation to an rms of 1."""
    return x / np.sqrt(np.mean(x ** 2) + 1e-20)


def along(points, hz):
    """Interpolation of (frequency [Hz], value) points on a log axis."""
    f, v = np.transpose(points)
    return np.interp(np.log(hz + 1), np.log(f + 1), v)


def curves(rows):
    """Interpolation in time: one value per sample for each column after the time."""
    s, *cols = np.transpose(rows)
    return [np.interp(np.arange(N) / SR, s, c) for c in cols]


def wobble(rate):
    """Band-limited fluctuation: a smooth random curve, rate knots a second."""
    knots = rng.standard_normal(int(N * rate / SR) + 4)
    return map_coordinates(knots, [np.arange(N) * rate / SR])


def filtered(x, response):
    """Linear filtering: the spectrum of x times a complex response of frequency."""
    n = x.shape[-1]
    m = next_fast_len(n + SR // 8)
    return irfft(rfft(x, m) * response(np.fft.rfftfreq(m, 1 / SR)), m)[..., :n]


def add(out, x, s):
    """Superposition: mix x into out from second s."""
    part = out[..., max(round(s * SR), 0):][..., :x.shape[-1]]
    part += x[..., :part.shape[-1]]


def scene():
    """Superposition of the rifle at its bench, its echo, a steel rattle, the birds and the background."""
    rifle = steel_contacts() + cartridges() + bench_knocks() + bolt_travel()
    birds = trill() + far_whistles()
    return rifle + range_echo(rifle) + falling_rattle() + birds + background()


TOP_HZ = 14700  # band limit


def record(dry):
    """Saturation and band limiting: the loudest clack clips; nothing is kept above TOP_HZ."""
    clipped = dry / (1 + np.abs(dry / 1.02) ** 8) ** (1 / 8)
    return filtered(clipped, lambda hz: hz < TOP_HZ)


dry = scene()
out = record(dry)
generate_wav(out)
```